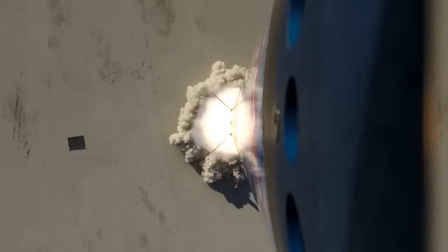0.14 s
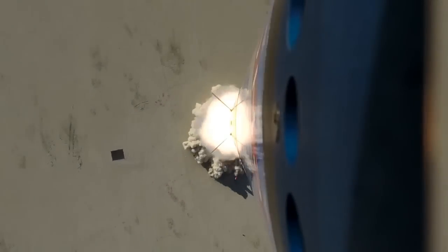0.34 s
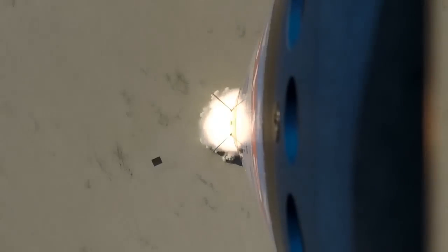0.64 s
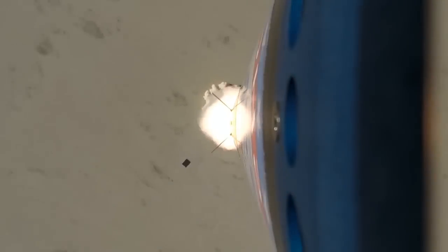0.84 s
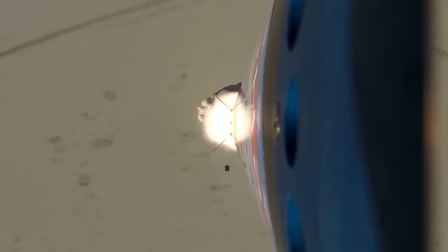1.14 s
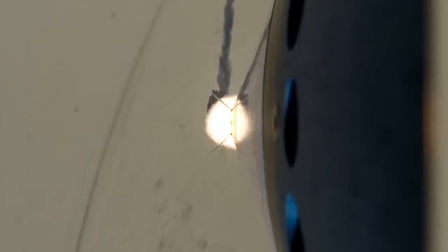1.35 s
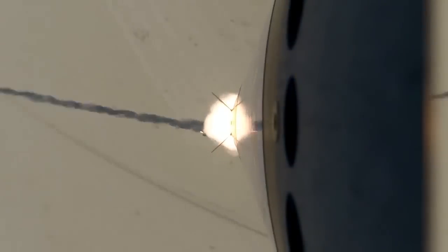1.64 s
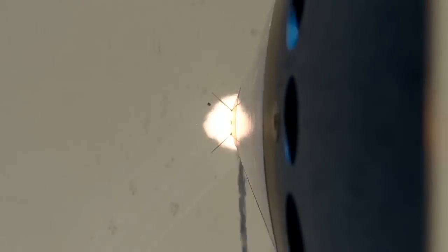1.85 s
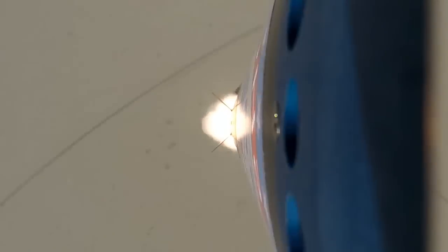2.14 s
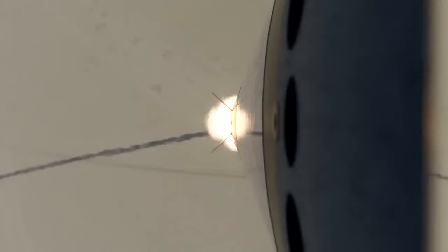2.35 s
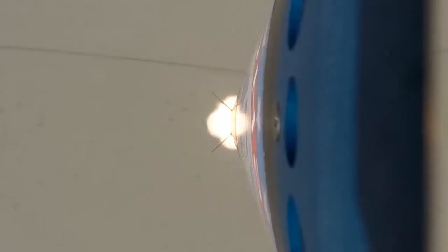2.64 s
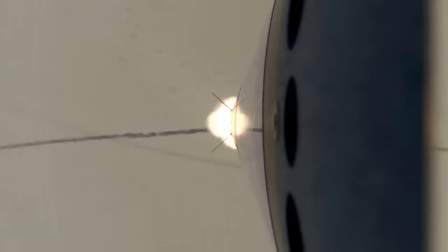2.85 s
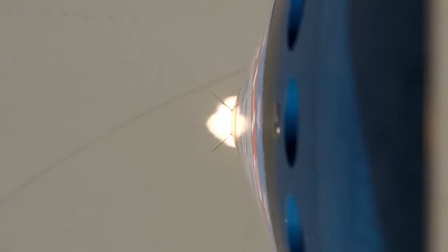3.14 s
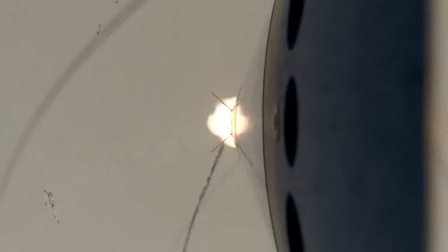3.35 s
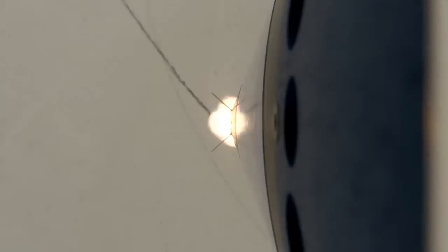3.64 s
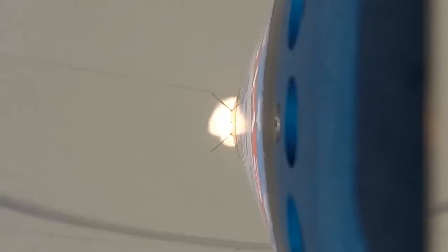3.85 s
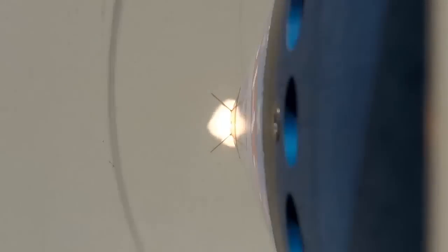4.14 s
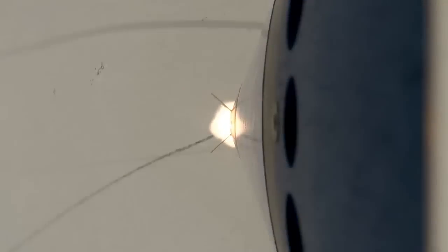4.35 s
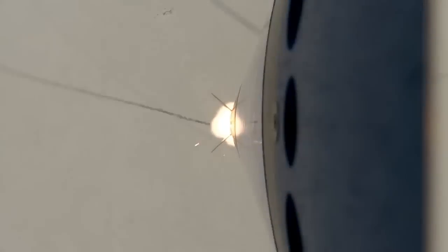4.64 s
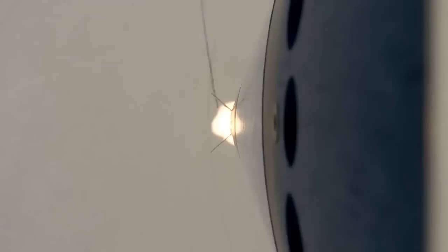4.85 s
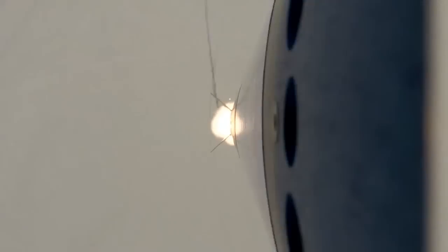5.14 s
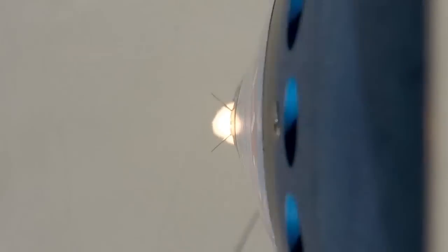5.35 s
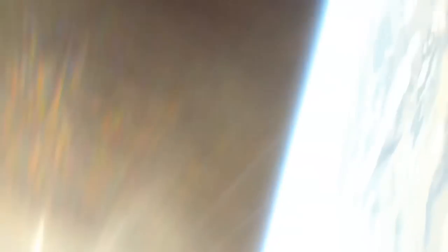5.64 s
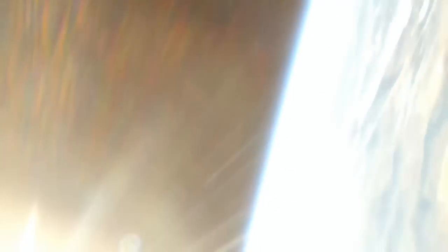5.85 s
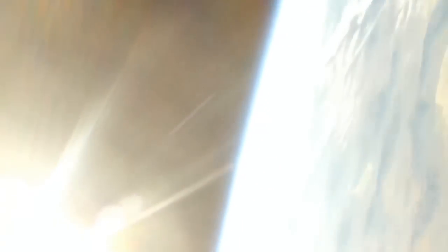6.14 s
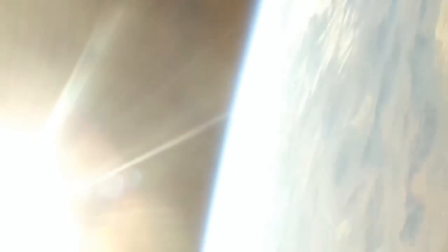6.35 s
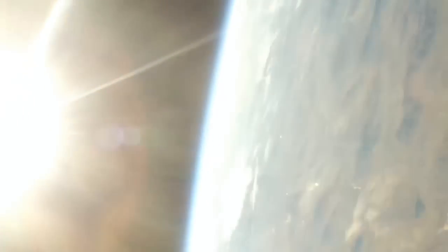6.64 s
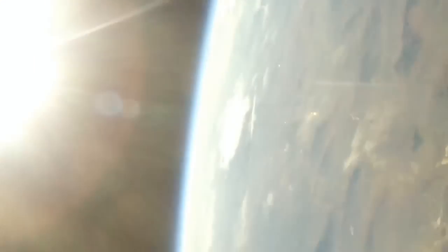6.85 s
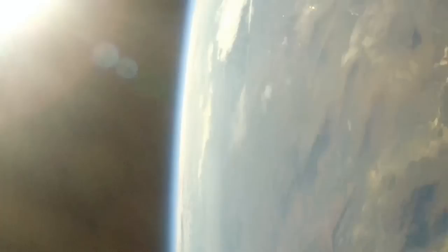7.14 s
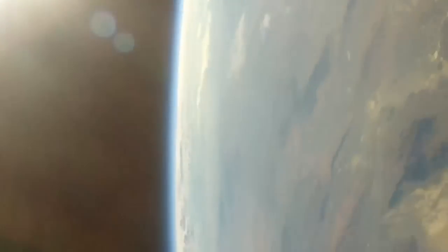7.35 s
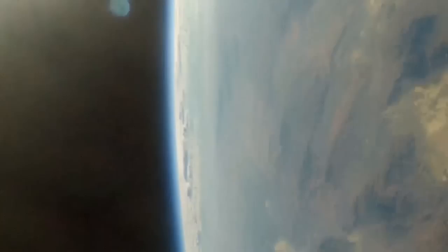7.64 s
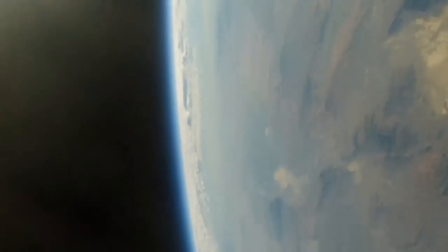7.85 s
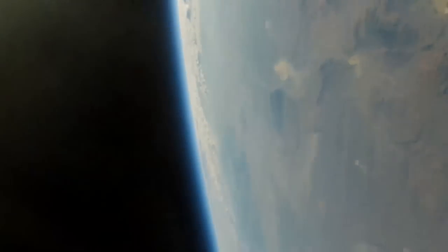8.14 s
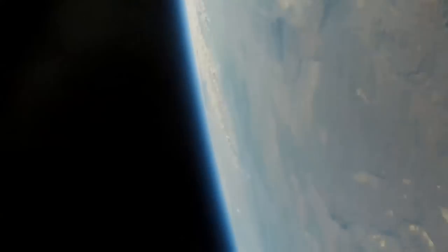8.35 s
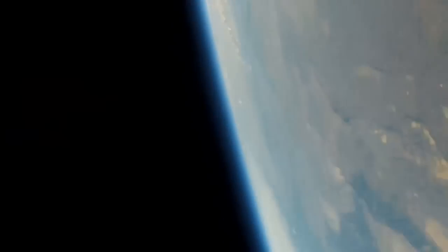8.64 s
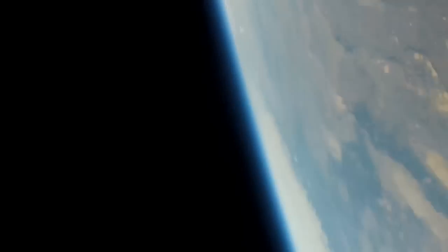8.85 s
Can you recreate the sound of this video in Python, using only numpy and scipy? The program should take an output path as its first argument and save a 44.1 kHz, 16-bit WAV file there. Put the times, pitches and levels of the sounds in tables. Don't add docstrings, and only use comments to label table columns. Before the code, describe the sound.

Close on the body of a climbing rocket, exhaust and wind shake the metal into a continuous harsh roar. Ground rumble fades while treble opens up, and a windy howl rises early on. Level dips briefly near 1.7 seconds. The roar is chopped off after five and a half seconds; a tiny gap follows, then a far quieter coast: steady soft hiss and irregular slowed rattles of loose parts, clustered in small bursts.

```python
import sys
import numpy as np
from scipy import signal
from scipy.fft import rfft, irfft
from scipy.io import wavfile
from scipy.ndimage import uniform_filter1d

SR = 44100
rng = np.random.default_rng(int(sys.argv[2]) if len(sys.argv) > 2 else 0)


def generate_wav(sig):
    pcm = np.round(np.clip(np.atleast_2d(sig).T, -1, 1) * 32767).astype(np.int16)
    wavfile.write(sys.argv[1], SR, pcm)


def voltage_ratio(level):
    return 10 ** (np.asarray(level, float) / 20)


N = 396302

# frequency_hz, density_db (per Hz)
SHAKE_SPECTRUM = [(12, -45.5), (20, -12), (49, -13.5), (137, -20.5), (190, -9.5), (252, -15.5), (416, -4.5),
                  (686, -10), (1410, -8.5), (1630, -10.5), (3450, -18), (7950, -30), (12000, -44),
                  (14400, -47)]
# pitch_hz, width_hz, height_db
HULL_MODES = [(612.4, 54, 7.5), (648, 163, -5.5), (983, 160, 4.5), (1385, 90.7, 6), (1534, 360, 1.5),
              (1880, 67, 2.5), (2368, 140, 6.5), (3070, 190, -2), (3340, 188, 5), (3524, 120, 9),
              (3910, 230, 4), (4030, 124, 3), (4100, 200, -3.5), (4368, 140, 5.5), (4550, 180, 0.5),
              (4870, 300, 5.5), (5240, 200, 5.5), (5854, 500, -5), (6090, 350, 6), (6620, 150, 2),
              (7050, 200, -2), (7710, 150, 4), (7850, 160, 6.5), (8270, 630, 2.5), (9044, 190, 2),
              (9250, 600, -3), (9841, 197, -4), (11200, 400, -0.5), (11600, 440, 4)]
# frequency_hz, share_of_brightness (ratio)
BRIGHTENING = [(900, 0), (1500, 0.12), (2100, .62), (2500, 0.55), (5000, 1.16), (8000, 1.1), (11000, 1.77),
               (14500, 1.7)]
# frequency_hz, density_db (per Hz)
RUMBLE_SPECTRUM = [(8.8, -39), (15, -3), (53, 1), (92, 1), (182, -13), (220, -33.5), (290, -53),
                   (480, -120)]
# pitch_factor (ratio), width_hz, level_db
BOOM_MODES = [
    (0.999, 80, 2),
    (1.1, 70, -1.5),
    (.87, 41, -5.5),
]
# time_s, pitch_hz
BOOM_PITCH = [(0, 435), (1.5, 425), (3, 433), (4, 408), (5.64, 406)]
# time_s, resonance_share (ratio)
CONTRAST = [(0, 1.15), (3, 1.05), (4.5, .8), (5.64, .7)]
# time_s, gain_db
SAG = [
    (1.66, 0.5),
    (1.71, -3),
    (1.79, -1.5),
    (1.805, 0.5),
]
# start_s, end_s, first_hz,
# last_hz, level_db
WAVERING_TONES = [(1.1, 2.0, 181, 177, -32), (2.0, 6.2, 176, 189, -34.5), (3.3, 6.4, 411, 410, -26.5),
                  (-.1, .5, 87, 95, -23), (.45, .95, 108, 114, -26), (-.2, 1.5, 63, 57, -28)]
# start_s, end_s, first_hz, last_hz, level_db
HOWL = [
    (.2, 1.5, 1330, 1700, -21),
    (.75, 1.75, 1650, 1720, -23),
]
# start_s, end_s, first_hz, last_hz, level_db
LOCKED_HOWL = [(1.7, 4.2, 1380, 1400, -27.5)]
# start_s, end_s, first_hz, last_hz, level_db
WHISTLE = [
    (.55, 1.8, 5450, 8000, -49),
    (1.95, 2.65, 9900, 12200, -57),
    (2.55, 3.1, 12200, 13800, -66),
    (4.2, 6.4, 6150, 6160, -41),
    (4.6, 6.4, 5000, 5010, -40),
]
# start_s, end_s, first_hz, last_hz, level_db
GUST = [(1.4, 1.68, 335, 324, -26)]
HOWL_WIDTH_HZ, LOCKED_WIDTH_HZ, WHISTLE_WIDTH_HZ, GUST_WIDTH_HZ = 360, 55, 300, 60
# frequency_hz, empty_share (ratio)
ROAR_GAPS = [(13900, 0), (14200, .15), (14500, .75), (14900, 1)]
# frequency_hz, empty_share (ratio)
COAST_GAPS = [(12400, 0), (12900, .15), (14800, .35), (15200, .9), (15400, 1)]
# time_s, low_hz, high_hz
UNLIKE_PATCHES = [(.9, 6300, 8300), (2.87, 5100, 6300), (2.87, 8300, 10400), (4.17, 8900, 11000),
                  (4.195, 4100, 5200), (4.195, 8300, 12500), (4.24, 6300, 7600), (4.335, 5100, 9000),
                  (4.335, 9600, 11800), (4.4, 5100, 6300), (4.98, 5600, 6900), (5.38, 8900, 10400),
                  (5.38, 11700, 13200), (5.61, 4600, 5700)]
# time_s, peak_db
AFTERCLICKS = [
    (5.6458, -41.5),
    (5.6546, -46),
]
# frequency_hz, density_db (per Hz)
HISS_SPECTRUM = [(8.8, -48), (15, -18), (75, -1.5), (185, -7), (268, -4.5), (399, -11.5), (430, -13),
                 (672, -17.5), (1030, -24), (1220, -25), (3740, -31.5), (5700, -35), (7410, -68),
                 (12500, -120)]
# time_s, peak_db, pitch_hz
THUDS = [(5.907, -40, 263), (6.046, -50, 184), (6.362, -53, 248), (6.509, -51, 242), (6.698, -53, 250),
         (6.771, -57, 253), (6.953, -55, 153), (7.209, -52, 288), (7.276, -47, 234), (7.307, -47, 281),
         (7.345, -44, 302), (7.772, -57.5, 261), (7.917, -49.5, 255), (8.142, -34, 307), (8.171, -33, 267),
         (8.194, -36.5, 244), (8.298, -39.5, 246), (8.828, -52.5, 153)]
# time_s, peak_db, pitch_hz
SLOW_BEAT_THUDS = [
    (5.867, -42, 256.5),
    (8.575, -39, 262),
]
# time_s, peak_db, pitch_hz
BUMPS = [(5.865, -53, 458), (6.115, -45, 376), (6.373, -53, 476), (7.348, -46, 450), (8.14, -36, 410),
         (8.175, -41, 407), (8.215, -54, 385), (8.292, -57, 441)]
# time_s, peak_db, pitch_hz
KNOCKS = [(5.865, -49.5, 756), (6.055, -51, 759), (6.117, -49, 637), (6.134, -45, 770), (6.208, -58, 703),
          (6.324, -56, 670), (6.362, -47, 740), (6.389, -52, 694), (6.514, -57, 760), (6.574, -55, 756),
          (6.596, -55, 760), (6.62, -59, 729), (6.685, -54, 576), (6.707, -53, 720), (7.273, -47, 711),
          (7.315, -48.5, 700), (7.351, -35.5, 735), (7.361, -39, 677), (7.455, -52.5, 766),
          (7.571, -61, 681), (7.785, -61, 692), (8.142, -44, 552), (8.153, -40, 692), (8.292, -57, 711),
          (8.471, -61.5, 777), (8.538, -55, 708), (8.552, -56, 750), (8.845, -56, 700)]
# time_s, peak_db, pitch_hz, t60_s, twin_share (ratio)
SWELLS = [(6.117, -28.5, 258, .17, .99), (5.95, -45, 262, .3, .3), (8.3, -39, 320, .08, .3),
          (8.145, -46, 140, .7, .2), (8.143, -55, 1750, .03, .6), (8.143, -46, 770, .12, .2),
          (7.273, -55, 1200, .08, .4), (7.273, -56, 1750, .06, .4), (6.117, -58, 1750, .03, .6),
          (6.686, -58, 2200, .04, .4)]
# time_s, peak_db, pitch_hz, crack_db (above the tick)
TICKS = [(5.8464, -65, 3740, -3), (5.8633, -63, 3990, -2.5), (5.9975, -64, 3603, -9),
         (6.1167, -50, 3750, -5), (6.2968, -57.5, 3860, -7), (6.3602, -60, 3630, 2),
         (6.6191, -61, 3736, -5), (6.686, -59, 4010, 2), (6.7413, -66, 3690, 2), (6.8022, -71, 3940, -1),
         (7.0067, -63, 3690, 0), (7.2716, -59, 3810, 1.5), (7.2966, -55, 3970, -8.5),
         (7.3534, -60.5, 3915, -3), (7.4502, -69, 3990, 5.5), (7.5774, -60, 3890, -4),
         (8.0933, -63.5, 3800, -0.5), (8.1396, -64, 3644, 3.5), (8.1826, -56, 3820, -4),
         (8.4654, -64.5, 3860, 0), (8.5348, -63.5, 4010, 2), (8.5986, -64.5, 3860, -4),
         (8.6749, -71.5, 3830, -1), (8.8246, -55, 3830, -7)]

DULL_DB, OPEN_S, BRIGHT_DB, BRIGHT_DB_PER_S, FULL_BRIGHT_DB = -14.8, .72, -4.7, .66, -3
SHAKE_DB, SHAKE_LAG_DB, SHAKE_BUILD_S, SHAKE_DB_PER_S = -19.5, -6, .8, -.6
RUMBLE_FAR_DB, RUMBLE_NEAR_DB, PAD_S, CLIMB_S = -38, 20, .55, 1.2
BOOM_DB, BOOM_DB_PER_S, LULL_S, LULL_WIDTH_S, LULL_DB = -24.5, .7, 1.22, .25, -6
EDGE_SHARE, EDGE_S = .3, .4
UNLIKE_DB = -2
CUT_S, COAST_S = 5.6388, 5.846
CUT_STEP_DB, CUT_STEP_S = -10, .0002
HISS_DB, OWN_NOISE_DB = -55.5, -25
HOLD_HZ = 48000 / 4 / 1.001
LEAD_S = .003
# (t60 s, share of the twin mode, twin offset Hz)
THUD_RING, BUMP_RING, KNOCK_RING = (.21, .68, 30), (.12, .42, 40), (.1, .58, 65)
SLOW_BEAT_RING = (.26, .6, 15)
SWELL_SPLIT = .09


def evened(x):
    return x / np.sqrt(np.mean(np.abs(x) ** 2) + 1e-20)


def read(points, hz):
    f, value = np.transpose(points)
    return np.interp(np.log(hz + 1), np.log(f + 1), value)


def curves(rows, t):
    s, *columns = np.transpose(rows)
    return [np.interp(t, s, c) for c in columns]


def add(mix, s, sound):
    part = mix[round(s * SR):][:len(sound)]
    part += sound[:len(part)]


def bell(f, hz, width):
    return 1 / (1 + (2 * (f - hz) / width) ** 2)


def share(power):
    return power / power.sum(axis=0, keepdims=True)


def grid(size, seconds):
    hop = size // 4
    frames = int(seconds * SR) // hop + 5
    return np.fft.rfftfreq(size, 1 / SR)[:, None], np.arange(frames) * hop / SR


def noise(power, patchy_db, flicker_db, size):
    real, imaginary, patches = rng.standard_normal(power.shape[::-1] + (3,)).T
    patches = uniform_filter1d(patches, size=9, axis=0)
    patches = evened(uniform_filter1d(patches, size=15, axis=1))
    flicker = evened(uniform_filter1d(rng.standard_normal(power.shape[1]), size=5))
    z = (real + 1j * imaginary) * evened(voltage_ratio(patchy_db * patches + flicker_db * flicker))
    overlap = size * 3 // 4
    white = signal.istft(z / np.sqrt(len(z)), nperseg=size, noverlap=overlap)[1]
    shaped = signal.istft(z * np.sqrt(power), nperseg=size, noverlap=overlap)[1][:N]
    return shaped / np.sqrt(np.mean(white ** 2))


def bass_cut(x):
    return signal.sosfilt(signal.butter(2, 16, "high", fs=SR, output="sos"), x)


def starved(x, empty, frames):
    f, t, z = signal.stft(x, SR, nperseg=1024)
    luck = rng.random((len(t) // frames + 1, len(f) // 4 + 1)).T
    luck = luck.repeat(4, axis=0).repeat(frames, axis=1)
    kept = luck[:len(f), :len(t)] > read(empty, f)[:, None]
    return signal.istft(z * kept, SR, nperseg=1024)[1][:len(x)]


def flight(t):
    shake_db = SHAKE_DB + SHAKE_LAG_DB * np.exp(-t / SHAKE_BUILD_S) + SHAKE_DB_PER_S * t
    bright_db = BRIGHT_DB + DULL_DB * np.exp(-t / OPEN_S) + BRIGHT_DB_PER_S * t
    rumble_db = RUMBLE_FAR_DB + RUMBLE_NEAR_DB * np.exp(-np.maximum(t - PAD_S, 0) / CLIMB_S)
    boom_db = BOOM_DB + BOOM_DB_PER_S * t + LULL_DB * bell(t, LULL_S, LULL_WIDTH_S)
    return shake_db, bright_db, rumble_db, boom_db


def hull_shake(f, t, shake_db, bright_db):
    modes_db = sum(db * bell(f, hz, width / 2) for hz, width, db in HULL_MODES)
    hull_db = read(SHAKE_SPECTRUM, f) + curves(CONTRAST, t)[0] * modes_db
    hull_db -= 4.0 * (f > 11900)
    power = voltage_ratio(hull_db) ** 2
    power = power / np.sum(power * ((f > 600) & (f < 1250)), axis=0)
    return power * voltage_ratio(shake_db + (bright_db - FULL_BRIGHT_DB) * read(BRIGHTENING, f)) ** 2


def ground_rumble(f, rumble_db):
    return share(voltage_ratio(read(RUMBLE_SPECTRUM, f)) ** 2 * (f < 230)) * voltage_ratio(rumble_db) ** 2


def casing_boom(f, t, boom_db):
    pitch_hz = curves(BOOM_PITCH, t)[0]
    boom = sum(voltage_ratio(db) ** 2 * bell(f, k * pitch_hz, width) ** 2 for k, width, db in BOOM_MODES)
    return share(boom) * voltage_ratio(boom_db) ** 2


def glide(row, t):
    start, end, first_hz, last_hz, db = row
    u = np.clip((t - start) / (end - start), 0, 1)
    edge = min(EDGE_SHARE, EDGE_S / (end - start))
    gain = voltage_ratio(db) * np.clip(np.minimum(u, 1 - u) / edge, 0, 1)
    return first_hz + (last_hz - first_hz) * u, gain


def flow_tones(rows, width_hz, f, t):
    tones = [glide(row, t) for row in rows]
    return sum(gain ** 2 * share(bell(f, hz, width_hz) ** 2) for hz, gain in tones)


def wavering_tone(row, s):
    hz, gain = glide(row, s)
    slow = s[::100]
    wander, swell = (np.interp(s, slow, evened(np.convolve(v, np.hanning(40), "same")))
                     for v in rng.standard_normal((len(slow), 2)).T)
    tone = np.sin(2 * np.pi * np.cumsum(hz * (1 + .045 * wander)) / SR)
    return np.sqrt(2) * tone * gain * voltage_ratio(2.9 * swell)


def roar():
    f, t = grid(size=2048, seconds=5.7)
    shake_db, bright_db, rumble_db, boom_db = flight(t)
    power = hull_shake(f, t, shake_db, bright_db)
    power += ground_rumble(f, rumble_db)
    power += casing_boom(f, t, boom_db)
    power += flow_tones(HOWL, HOWL_WIDTH_HZ, f, t)
    power += flow_tones(LOCKED_HOWL, LOCKED_WIDTH_HZ, f, t)
    power += flow_tones(WHISTLE, WHISTLE_WIDTH_HZ, f, t)
    power += flow_tones(GUST, GUST_WIDTH_HZ, f, t)
    x = bass_cut(noise(power, patchy_db=0.81, flicker_db=0.5, size=2048))
    s = np.arange(len(x)) / SR
    x = x + sum(wavering_tone(row, s) for row in WAVERING_TONES)
    x = x * voltage_ratio(curves(SAG, s)[0]) * np.clip(s / 0.0014, 0, 1)
    x = 2.5 * np.tanh(x / 2.5)
    x = starved(x, ROAR_GAPS, frames=8)
    return np.pad(x, (0, N))[:N]


def unlike(x):
    out, window = np.zeros(N), np.hanning(2048)
    f = np.fft.rfftfreq(2048, 1 / SR)
    for s, low_hz, high_hz in UNLIKE_PATCHES:
        earlier = x[round(s * SR) - 6144:][:2048] * window
        add(out, s - 1024 / SR, irfft(rfft(earlier) * (f > low_hz) * (f < high_hz)))
    return voltage_ratio(UNLIKE_DB) * out


def cut(x):
    t = np.arange(N) / SR - CUT_S
    smear = voltage_ratio(-34 - 900 * t) * (t < .036)
    out = x * np.where(t < 0, 1, smear)
    out = out - voltage_ratio(CUT_STEP_DB) * np.exp(np.minimum(t, 0) / CUT_STEP_S) * (t < 0)
    for s, db in AFTERCLICKS:
        add(out, s, voltage_ratio(db) * rng.standard_normal(60) * np.hanning(60))
    return out


def ticks():
    out, t = np.zeros(N), np.arange(1500) / SR
    dull_band = signal.butter(2, [900, 3200], "band", fs=SR)
    cracks = rng.standard_normal((len(TICKS), 1500))
    for (s, db, hz, crack_db), crack in zip(TICKS, cracks):
        crack = evened(signal.lfilter(*dull_band, crack)) * voltage_ratio(-60 * t / .05)
        for factor, size, t60 in ((1, .8, .035), (1.07, .7, .015), (.93, -.6, .015)):
            add(out, s - LEAD_S / 2, voltage_ratio(db + 2.0) * size * ring(hz * factor, t60))
        add(out, s - LEAD_S / 2, voltage_ratio(db + crack_db - 1) * crack * np.clip(t / .001, 0, 1))
    return out


def ring(hz, t60, rise_s=0.0012):
    t = np.arange(int(SR * min(t60, .5))) / SR
    return voltage_ratio(-60 * t / t60) * (1 - np.exp(-t / rise_s)) * np.sin(2 * np.pi * hz * t)


def loose_parts():
    parts = ((THUDS, THUD_RING), (BUMPS, BUMP_RING), (KNOCKS, KNOCK_RING), (SLOW_BEAT_THUDS, SLOW_BEAT_RING))
    blows = [(*row, *part) for rows, part in parts for row in rows]
    return blows + [(*row, SWELL_SPLIT * row[2]) for row in SWELLS]


def knocks(rows):
    out = np.zeros(N)
    for s, db, hz, t60, twin, split_hz in rows:
        twin_hz = hz - split_hz if 730 < hz < 900 else hz + split_hz
        pair = ring(hz, t60) - np.clip(twin, 0, 1) * ring(twin_hz, t60)
        add(out, s - LEAD_S, voltage_ratio(db) * pair / np.abs(pair).max())
    return out


def held(x):
    x = signal.sosfilt(signal.butter(8, 5600, fs=SR, output="sos"), x)
    mirrored = x * (1 + 2 * np.cos(2 * np.pi * HOLD_HZ * np.arange(N) / SR))
    return irfft(rfft(mirrored) * np.sinc(np.fft.rfftfreq(N, 1 / SR) / HOLD_HZ), N)


def coast():
    f, t = grid(size=1024, seconds=N / SR)
    lumpy_db = .3 + 1.2 * bell(f, 0, 1600)
    power = share(voltage_ratio(read(HISS_SPECTRUM, f)) ** 2 + 0 * t)
    hiss = noise(power, patchy_db=lumpy_db, flicker_db=-0.2, size=1024)
    hiss = bass_cut(hiss) * voltage_ratio(HISS_DB)
    out = hiss + knocks(loose_parts()) + ticks()
    mid = starved(held(out), COAST_GAPS, frames=3)
    return mid, voltage_ratio(OWN_NOISE_DB) * held(hiss[::-1])


def scene():
    coasting = np.clip((np.arange(N) / SR - COAST_S) / .002, 0, 1)
    burn = roar()
    coast_mid, coast_side = coast()
    mid = cut(burn) + coast_mid * coasting
    side = unlike(burn) + coast_side * coasting
    return np.array([mid + side, mid - side])


def band_limit(x):
    return signal.sosfilt(signal.butter(12, 15710, fs=SR, output="sos"), x)


def record(dry):
    return band_limit(dry)


dry = scene()
out = record(dry)
generate_wav(out)
```